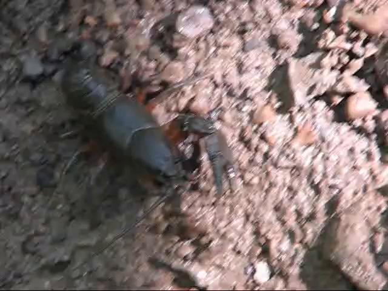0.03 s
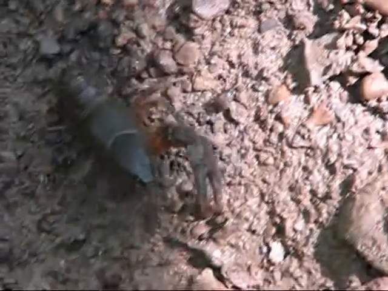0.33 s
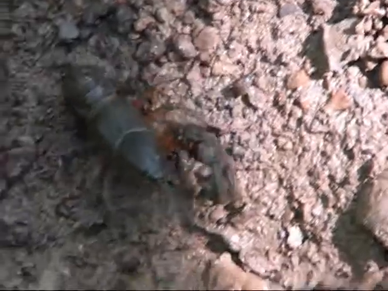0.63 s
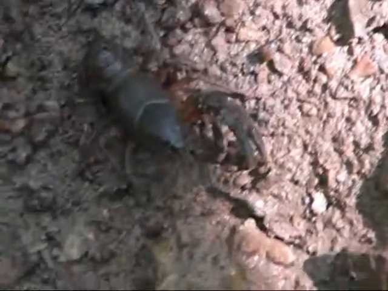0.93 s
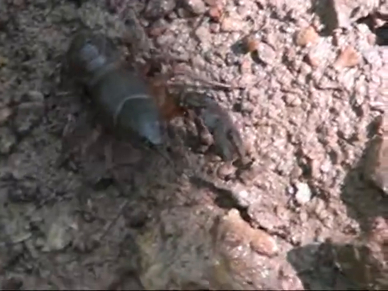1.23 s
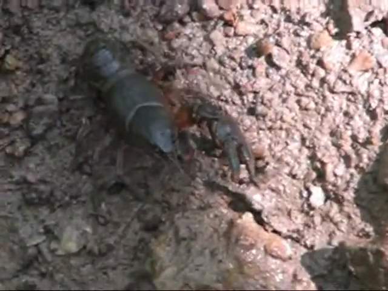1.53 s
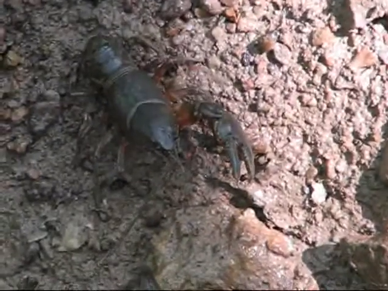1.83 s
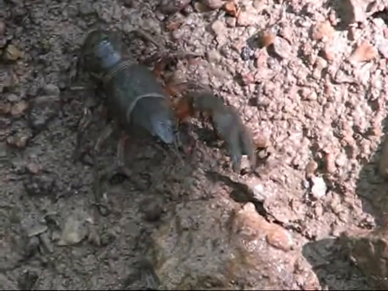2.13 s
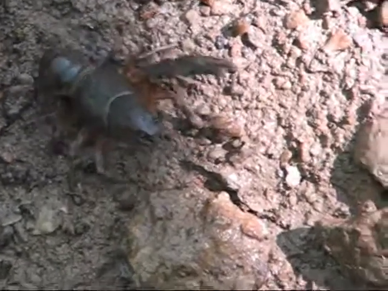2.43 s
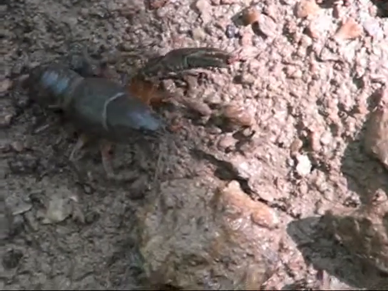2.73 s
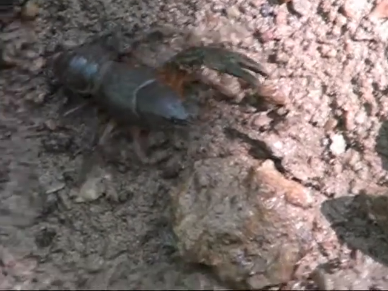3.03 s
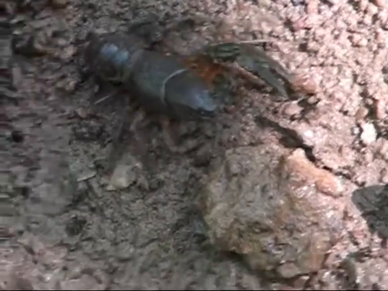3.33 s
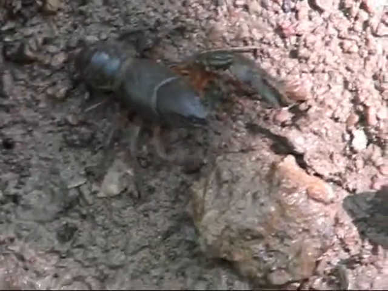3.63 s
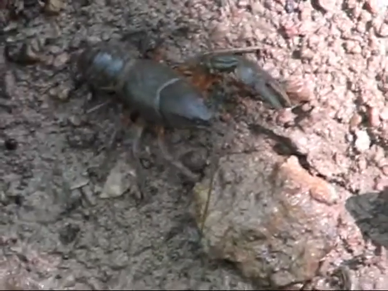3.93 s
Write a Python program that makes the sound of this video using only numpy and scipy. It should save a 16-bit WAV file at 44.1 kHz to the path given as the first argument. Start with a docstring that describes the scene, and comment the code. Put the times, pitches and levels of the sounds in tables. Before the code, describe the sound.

A cicada throbs unevenly, then buzzes steadily and stops, over a distant insect hiss.

```python
"""After a short silence, a cicada by a creek bank throbs unevenly over a far hissing insect chorus.
Its song is the clicking of its tymbal, a ribbed skin, and it echoes off stones and leaves.
Before 2 s it settles into a steady buzz, and then a faint bird-like call comes from far away.
The buzz winds down and stops near 3.3 s, while the chorus hisses on to the end.
Soft scattered knocks and a faint low rumble lie underneath all along."""
import sys
import numpy as np
from scipy import signal
from scipy.fft import rfft, irfft
from scipy.io import wavfile
from scipy.ndimage import uniform_filter1d

SR = 44100
rng = np.random.default_rng(int(sys.argv[2]) if len(sys.argv) > 2 else 0)


def dump(signal):
    """Clip the signal to [-1, 1] and save it as 16-bit WAV at the path in sys.argv[1]."""
    limited = np.clip(np.atleast_2d(signal).T, -1, 1)
    pcm = np.round(limited * 32767).astype(np.int16)
    wavfile.write(sys.argv[1], SR, pcm)


N = 176400  # 4 seconds


def cicada(t):
    """Clicks ring at a few sharp pitches, making a broad buzz, a swelling drone and shrill throbs."""
    # pitches that ring in the buzz and the throbs: f/Hz, width/Hz, boost/dB
    song_rings = [(4195, 36, 6), (4885, 30, 11), (5416, 16, 8), (5537, 30, 7), (5751, 16, 6), (6040, 26, 7),
                  (6353, 45, 5), (6599, 16, 7), (6705, 24, 7), (6761, 16, 7), (6865, 15, 8), (7030, 15, 7),
                  (7195, 18, 9)]
    # pitches that ring in the drone: f/Hz, width/Hz, relative level/dB
    drone_rings = [(3180, 70, -15), (4400, 70, -8), (4885, 42, 3), (5010, 180, -8), (5140, 80, -2.5),
                   (5540, 36, -2.5)]
    # how hard the cicada sings: t/s, relative level/dB
    effort_curve = [(0.17, -41), (0.36, -38), (0.4, -40.5), (0.43, -37.5), (0.8, -40), (0.93, -39),
                    (0.96, -40.5), (0.99, -39), (1.43, -37), (1.46, -41.5), (1.67, -36.5), (1.72, -43.5),
                    (1.77, -37.5), (2.82, -40), (2.86, -42.5), (2.91, -39), (3.06, -40), (3.135, -45.5),
                    (3.16, -39.5), (3.28, -49.5)]
    # the drone's strength next to the buzz: t/s, level/dB
    drone_curve = [(.9, -21), (1.8, -19), (2.35, -11.5), (2.6, -10.5), (3.2, -10.5)]
    # tone of the buzz: f/Hz, relative level/dB
    buzz_tone = [(2400, -32), (3100, -17.5), (3330, -20.5), (3540, -9), (4150, -7), (4740, -9.5),
                 (4950, -6), (5800, -4.5), (7300, 0.5), (8250, -2), (8700, -7), (9600, -10.5), (10300, -25),
                 (12700, -30.5), (14000, -50)]
    # tone of the throbs: f/Hz, relative level/dB
    throb_tone = [(2800, -34.5), (3900, -10.5), (5000, -17.5), (5800, -6.5), (6300, 0.5), (7200, 0.5),
                  (7800, 1), (8400, -7), (9500, -12.5), (10500, -27.5), (12800, -24), (14000, -43)]
    # the single throbs: middle t/s, length/s, level/dB
    throb_swells = [(0.199, 0.054, -24.5), (0.28, 0.059, -27), (0.343, 0.035, -25.5), (0.437, 0.075, -29.5),
                    (0.488, 0.033, -26.5), (0.559, 0.043, -28.5), (0.62, 0.05, -26), (0.69, 0.054, -29.5),
                    (0.762, 0.04, -29), (.835, .05, -33), (0.906, 0.043, -28.5), (0.982, 0.045, -33),
                    (1.063, 0.054, -27), (1.15, 0.087, -33), (1.235, 0.05, -28), (1.426, 0.041, -28.5),
                    (1.516, 0.056, -34.5), (1.592, 0.044, -34), (1.65, 0.05, -31)]
    fade_start_s, fade_s = 3.25, 0.095

    song_gain = 1 + sum((from_db(db) - 1) * peak(f, width) for f, width, db in song_rings)
    drone_gain = sum(from_db(db) * peak(f, width) for f, width, db in drone_rings)
    buzz_clicks = filtered(tymbal(), song_gain * creek_bank(t))
    drone_clicks = filtered(tymbal(), drone_gain * creek_bank(t))
    throb_clicks = filtered(tymbal(), song_gain * creek_bank(t, directness=0.88))  # a bit more echo

    buzz = shape_tone(buzz_clicks, buzz_tone)
    drone = from_db(over_time(t, drone_curve)) * normalise(drone_clicks)
    throbs = swells(t, throb_swells) * shape_tone(throb_clicks, throb_tone)
    effort = from_db(over_time(t, effort_curve) + 6)
    fade = np.clip(1 - (t - fade_start_s) / fade_s, 0, 1)
    return effort * fade * (buzz + drone) + throbs


def tymbal():
    """The tymbal's ribs buckle one by one in quick, uneven clicks, with a rasp between them."""
    typical_rate_hz, unevenness, spread_db = 639.2, 0.3, 2.1
    gap_chance, size_chance = rng.standard_normal((N // 20, 2)).T
    gaps = np.exp(unevenness * gap_chance) * SR / typical_rate_hz  # in samples
    starts = np.cumsum(gaps).astype(int)
    signs = np.sign(rng.standard_normal(len(starts)))
    sizes = signs * from_db(spread_db * size_chance)
    clicks = np.bincount(starts[starts < N], weights=sizes[starts < N], minlength=N)
    rasp = rng.standard_normal(N)
    return normalise(clicks) + rasp


def creek_bank(t, directness=1):
    """Filter gains for each ear: sound comes straight, and as short echoes off stones and leaves."""
    # the part of the sound that comes straight: f/Hz, share (limited to 0-1 below)
    direct_share = [(3000, 0.53), (3750, -0.03), (4200, 1.4), (5900, 0.7), (6500, 1.1), (7000, 0),
                    (8300, 0.22), (9300, -1.1), (11500, 0.85)]
    # which ear hears the cicada louder: f/Hz, left minus right/dB
    balance = [(3200, -1.5), (3650, 5.5), (4150, -0.5), (6300, 1), (7000, -10.5), (7900, -1.5), (8350, -7),
               (9300, -11), (11500, 0.5)]
    echoes_per_s, decay_s = 2500, 0.021
    echoes = rng.standard_normal((2, N)) * np.exp(-t / decay_s)
    echoes *= rng.random((2, N)) < echoes_per_s / SR  # keep only scattered moments
    echoes /= np.sqrt(np.sum(echoes ** 2, axis=1, keepdims=True))
    share = np.clip(directness * over_frequency(direct_share), 0, 1)
    return (np.sqrt(share) + np.sqrt(1 - share) * rfft(echoes)) * ear_gains(balance)


def chorus(t):
    """Many far insects blend into a wavering hiss; the lower voices swell, then sink near the end."""
    # tone of the high voices: f/Hz, relative level/dB
    high_tone = [(2400, -54), (3000, -36.5), (3600, -25), (4050, -13.5), (4700, -18), (5800, -14),
                 (6700, -6), (7400, -1), (8100, 0.5), (8600, -12.5), (9300, -24.5), (10300, -45),
                 (12000, -88)]
    # which ear hears them louder: f/Hz, left minus right/dB
    balance = [(3900, 4), (5600, 0), (7300, -5), (8500, -3.5), (9400, -19)]
    # their slow rise and fall: t/s, level change/dB
    high_curve = [(.2, -1), (2.0, -2), (3.35, 1.5), (3.55, -0.5)]
    # tone of the lower voices: f/Hz, relative level/dB
    low_tone = [(2800, -36), (3900, -1), (6000, 4.5), (9000, -37)]
    # loudness of the lower voices: t/s, level/dB
    low_curve = [(2.9, -52), (3.3, -47.5), (3.55, -58)]
    high_db, waver_db, flutter_db = -36, 0.68, 0.2
    hiss = rng.standard_normal((2, N))
    hiss *= from_db(waver_db * wander(rate_hz=12) - flutter_db * wander(rate_hz=380))
    hiss = filtered(hiss, ear_gains(balance))
    high = from_db(high_db + over_time(t, high_curve)) * shape_tone(hiss, high_tone)
    low = from_db(over_time(t, low_curve)) * shape_tone(rng.standard_normal((2, N)), low_tone)
    return high + low


def knocks(t):
    """Soft knocks, some clear and some faint: a touch and a short scuff set off the same dull ring."""
    # the clearer knocks: t/s, peak level/dB
    clear = [(1.225, -40.5), (1.297, -51.5), (1.363, -51.5), (1.629, -47.5), (1.675, -52), (2.01, -50),
             (2.291, -49), (2.452, -52), (2.823, -51.5), (2.953, -50), (3.311, -51.5), (3.495, -48),
             (3.614, -51), (3.892, -47.5)]
    # the notes in each knock: f/Hz, time to fade by 60 dB/s, relative level/dB
    notes = [(300, .1, -13), (376, 0.075, -5), (940, 0.05, -7)]
    faint_per_s, faint_db = 5, -58
    scuff_decay_s, touch_strength = 0.0053, 4
    age = t[:N // 20]
    ring = sum(from_db(db - 60 * age / fade_s) * np.sin(2 * np.pi * f * age) for f, fade_s, db in notes)
    chances = rng.random((int(faint_per_s * t[-1]), 2))
    faint = [(when * t[-1], faint_db + 0.5 - softness) for when, softness in chances]
    sound = np.zeros(N)
    for start_s, db in clear + faint:
        push = rng.standard_normal(len(age)) * np.exp(-age / scuff_decay_s)
        push[0] += touch_strength * np.linalg.norm(push)  # the first touch outweighs the scuff
        knock = signal.fftconvolve(push, ring)
        knock *= from_db(db) / np.abs(knock).max()
        start = int(start_s * SR)
        sound[start:start + len(knock)] += knock[:N - start]
    return sound


def far_call(t):
    """A hoarse, bird-like call from far away, blurred by the trees."""
    # the parts of the call: middle t/s, length/s, level/dB
    call_swells = [(2.13, 0.045, -56.5), (2.2, 0.12, -55), (2.392, 0.088, -59.5)]
    # tone of the call: f/Hz, relative level/dB
    call_tone = [(1100, -19), (1290, -7), (1385, 1), (1600, -19), (1800, -45)]
    return swells(t, call_swells) * shape_tone(rng.standard_normal((2, N)), call_tone)


def background(t):
    """A faint wavering rumble, the same in both ears, and the hush of open air from all around."""
    # tone of the rumble: f/Hz, relative level/dB
    rumble_tone = [(25, -9.5), (110, 1), (135, -0.5), (170, -10), (250, -6.5), (285, 2), (320, -2.5),
                   (370, -4.5), (460, -10.5), (700, -8), (1500, -11), (3000, -11.5), (6000, -51)]
    # the rumble's slow rise: t/s, level change/dB
    rumble_curve = [(.2, -1.5), (1.2, 0.5), (4.0, 1.14)]
    # tone of the air: f/Hz, relative level/dB
    air_tone = [(30, -14), (120, -2), (320, 1), (550, -2.5), (950, 4), (1150, -0.5), (2000, -4), (2800, -3),
                (3500, -1.5), (7000, -18.5), (12000, -39)]
    rumble_db, waver_db, air_db = -60.5, 0.7, -60.5
    level_db = rumble_db + over_time(t, rumble_curve) + waver_db * wander(rate_hz=13)
    rumble = from_db(level_db) * shape_tone(rng.standard_normal(N), rumble_tone)
    air = from_db(air_db) * shape_tone(rng.standard_normal((2, N)), air_tone)
    return rumble + air


def from_db(db):
    """Turn decibels into a number to multiply a sound by."""
    return 10 ** (np.asarray(db) / 20)


def normalise(sound):
    """Scale a sound so that its average strength (rms) is 1."""
    return sound / np.sqrt(np.mean(sound ** 2))


def over_time(t, points):
    """Join (t/s, value) points with straight lines."""
    return np.interp(t, *np.array(points).T)


def over_frequency(points):
    """Join (f/Hz, value) points with straight lines, giving every octave the same room."""
    point_hz, values = np.array(points, float).T
    hz = np.maximum(np.fft.rfftfreq(N, 1 / SR), 1)
    return np.interp(np.log(hz), np.log(point_hz), values)


def peak(middle_hz, width_hz):
    """Filter gains that are 1 at one pitch and fall away on both sides."""
    hz = np.fft.rfftfreq(N, 1 / SR)
    return 1 / (1 + (2 * (hz - middle_hz) / width_hz) ** 2)


def filtered(sound, gains):
    """Multiply each frequency in a sound by its own gain."""
    return irfft(rfft(sound) * gains, N)


def shape_tone(sound, tone):
    """Filter a sound by (f/Hz, level/dB) points, then bring its strength to 1."""
    return normalise(filtered(sound, from_db(over_frequency(tone))))


def ear_gains(balance):
    """Share a sound between the ears by (f/Hz, left minus right/dB) points."""
    gains = from_db(np.array([[0.5], [-0.5]]) * over_frequency(balance))
    return gains / np.sqrt(np.mean(gains ** 2, axis=0))


def wander(rate_hz):
    """A random curve of strength 1 that glides to a new value rate_hz times a second."""
    hold = max(int(SR / rate_hz), 1)
    steps = np.repeat(rng.standard_normal(N // hold + 1), hold)
    return normalise(uniform_filter1d(steps, hold)[:N])


def swells(t, rows):
    """A loudness curve of rounded bumps from (middle t/s, length at half power/s, level/dB) rows."""
    power = sum(from_db(db) ** 2 * 0.5 ** ((2 * (t - at) / length) ** 2) for at, length, db in rows)
    return np.sqrt(power)


def scene():
    """Add up all the sources at the two ears."""
    t = np.arange(N) / SR
    return cicada(t) + chorus(t) + background(t) + knocks(t) + far_call(t)


def record(dry):
    """The sound cuts in after a short silence, and its highest treble is removed."""
    start_s, rise_s, top_hz = 0.165, 0.002, 13400
    fade_in = np.clip((np.arange(N) / SR - start_s) / rise_s, 0, 1)
    low_pass = signal.ellip(8, 0.2, 70, top_hz, fs=SR, output="sos")
    return signal.sosfilt(low_pass, dry * fade_in)


dry = scene()
out = record(dry)
dump(out)
```